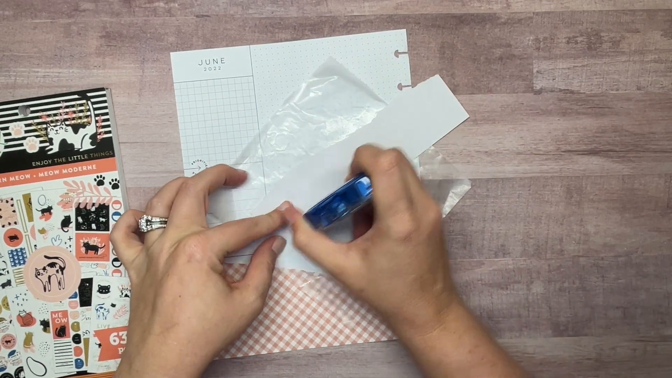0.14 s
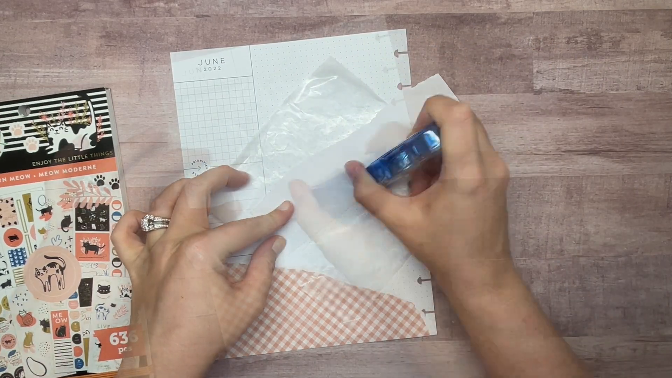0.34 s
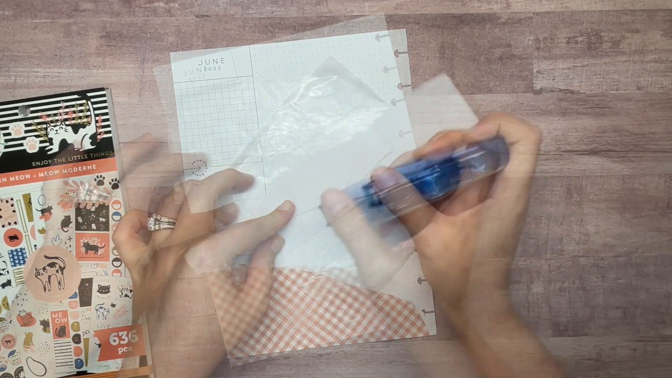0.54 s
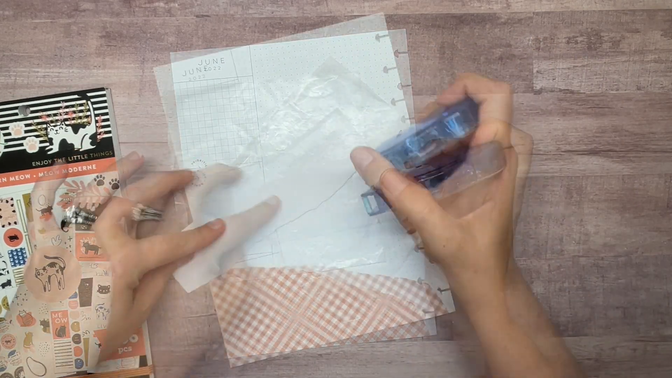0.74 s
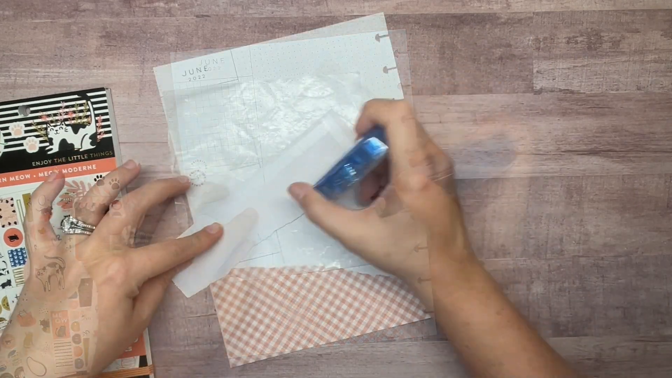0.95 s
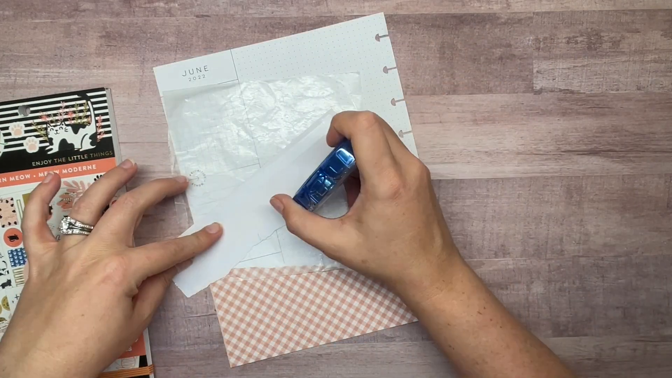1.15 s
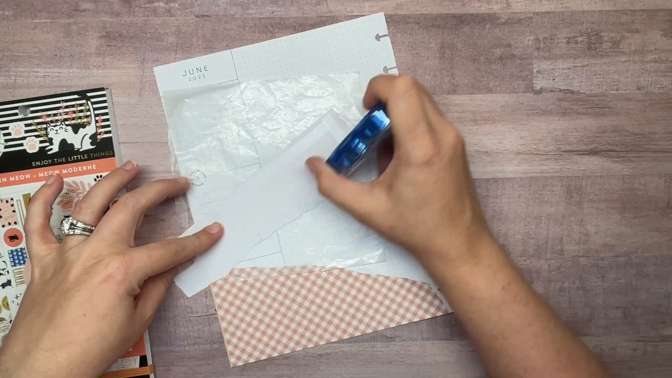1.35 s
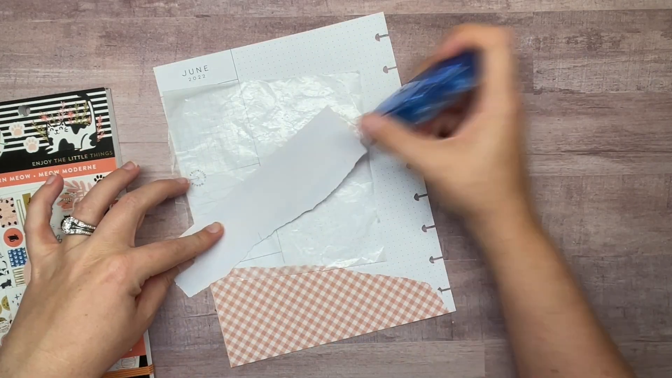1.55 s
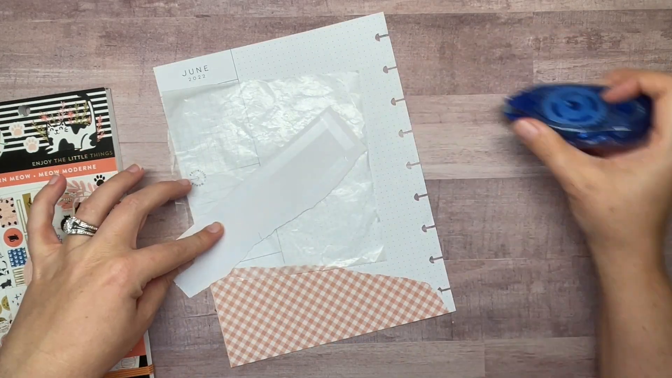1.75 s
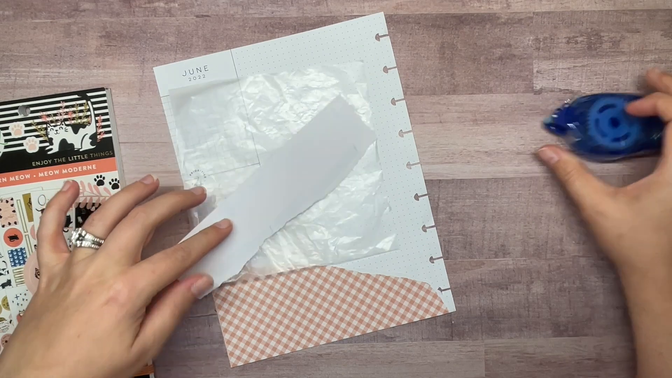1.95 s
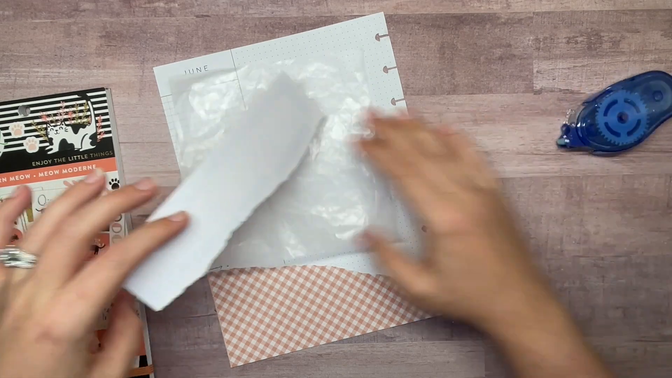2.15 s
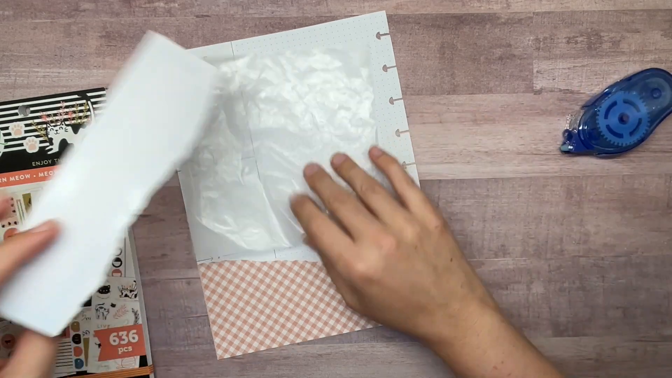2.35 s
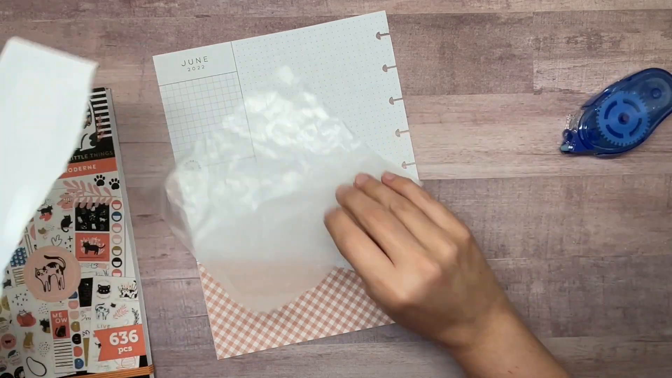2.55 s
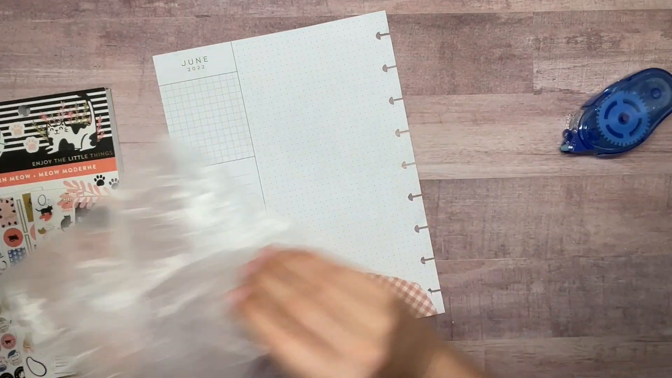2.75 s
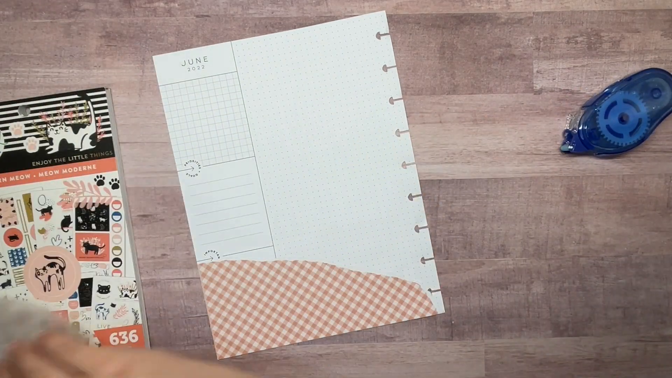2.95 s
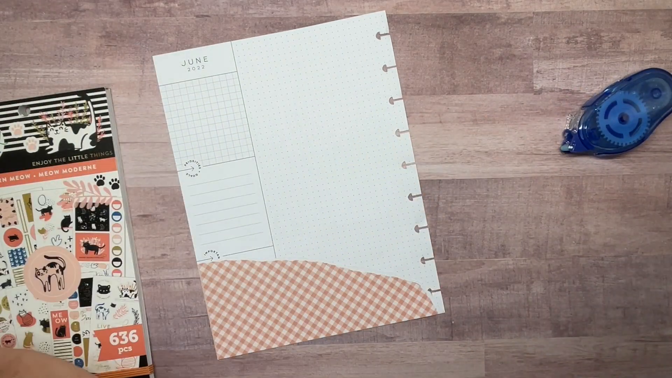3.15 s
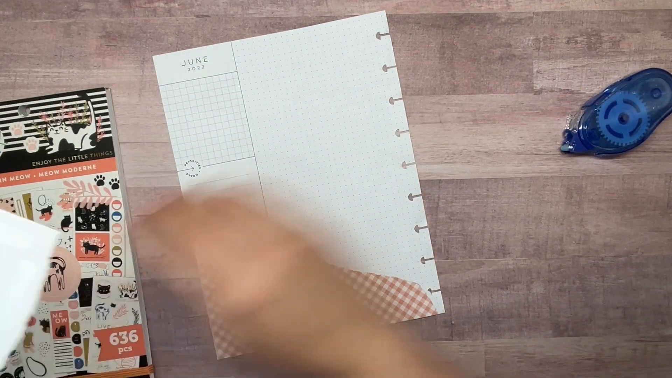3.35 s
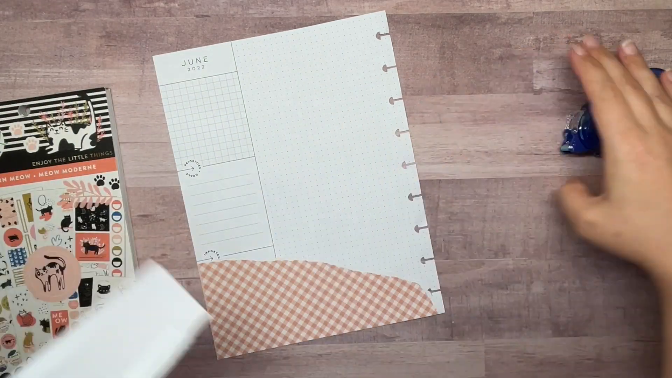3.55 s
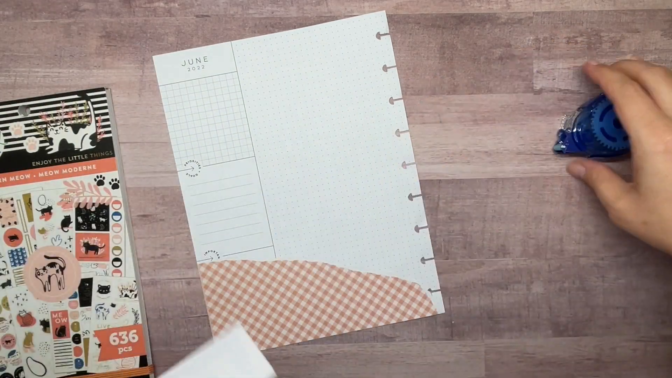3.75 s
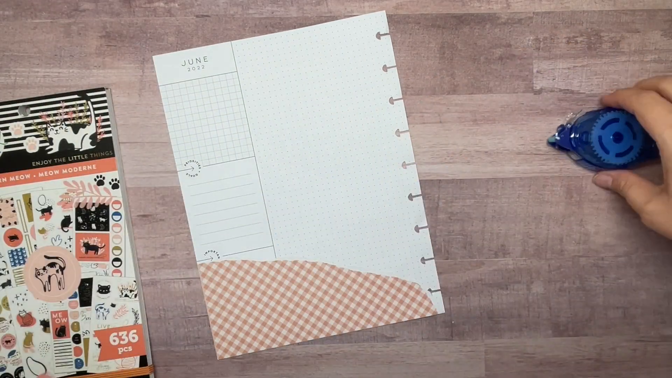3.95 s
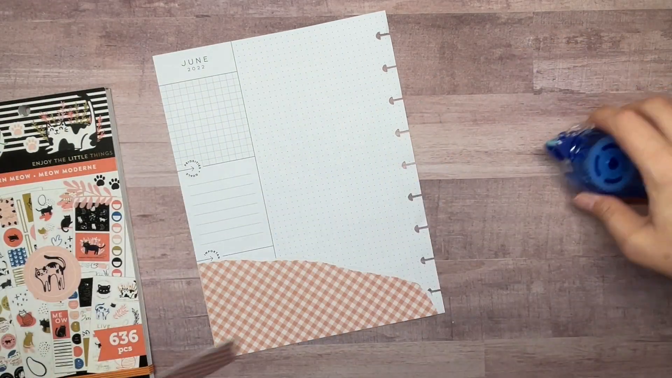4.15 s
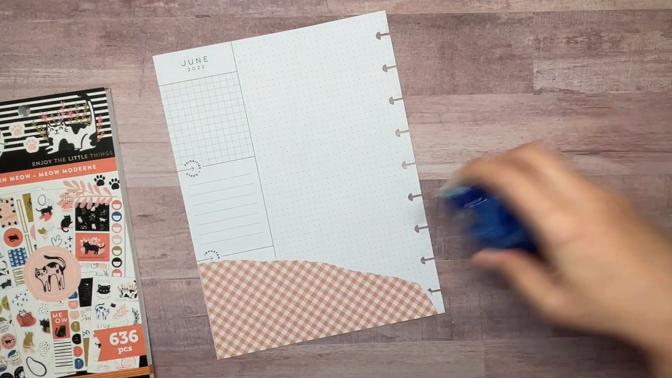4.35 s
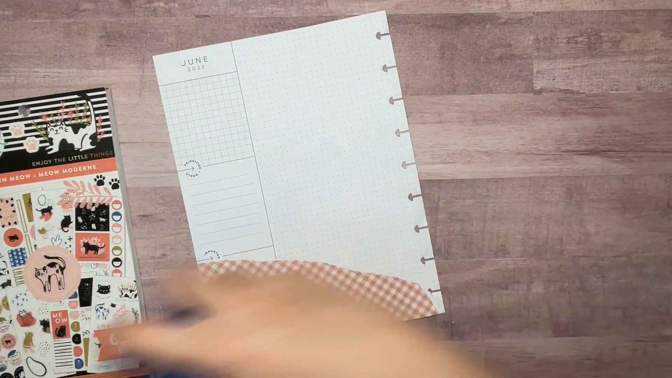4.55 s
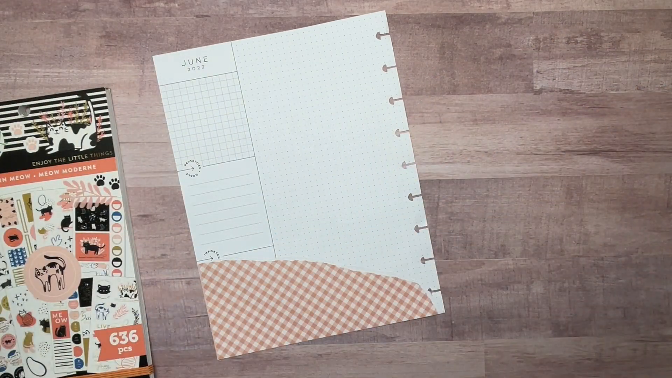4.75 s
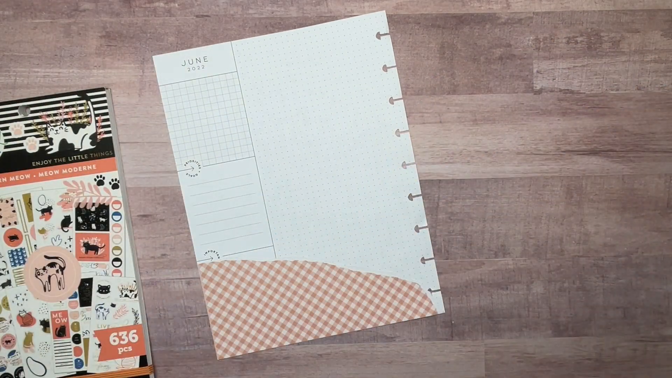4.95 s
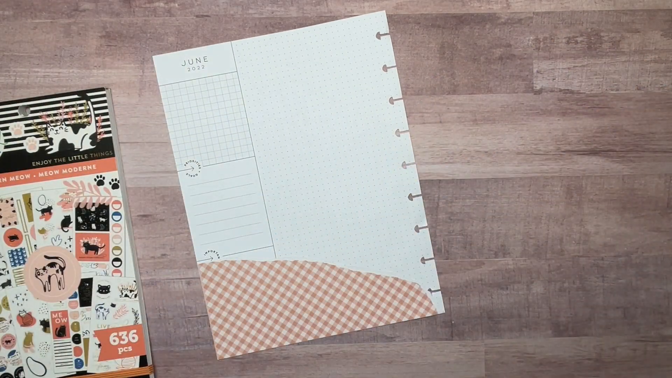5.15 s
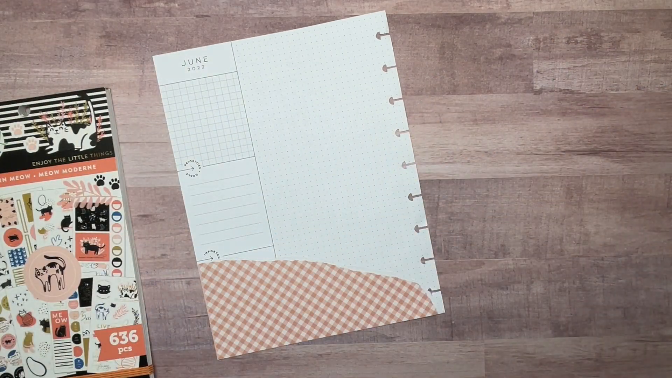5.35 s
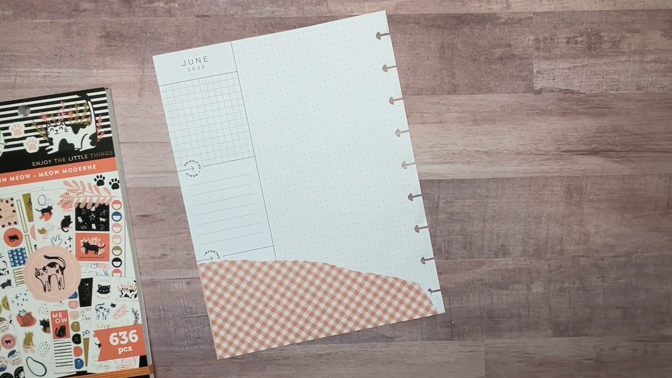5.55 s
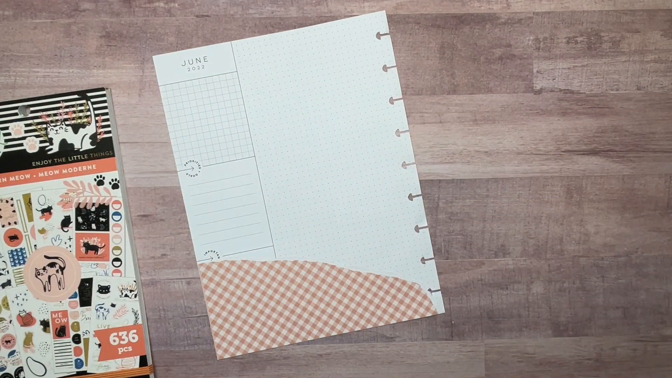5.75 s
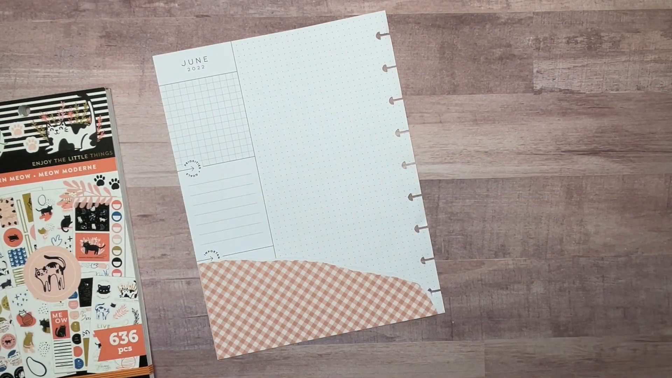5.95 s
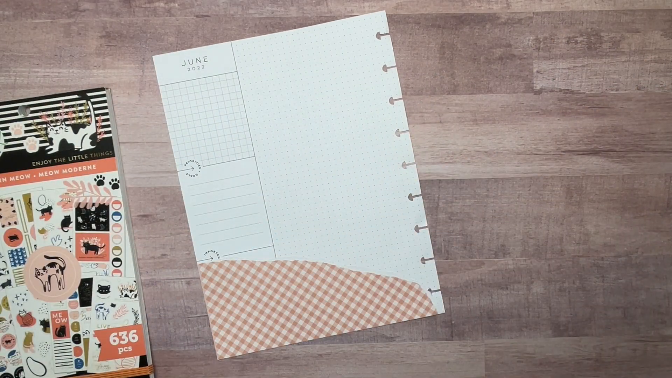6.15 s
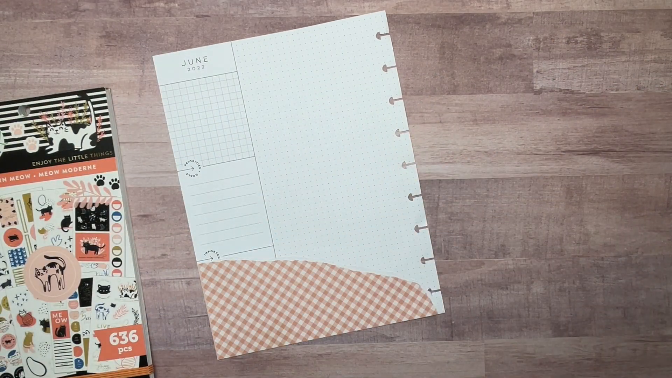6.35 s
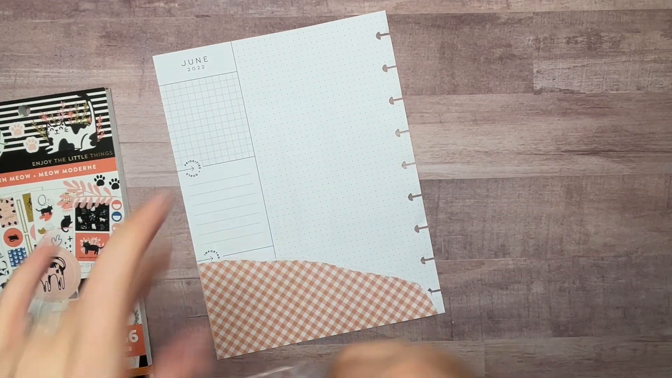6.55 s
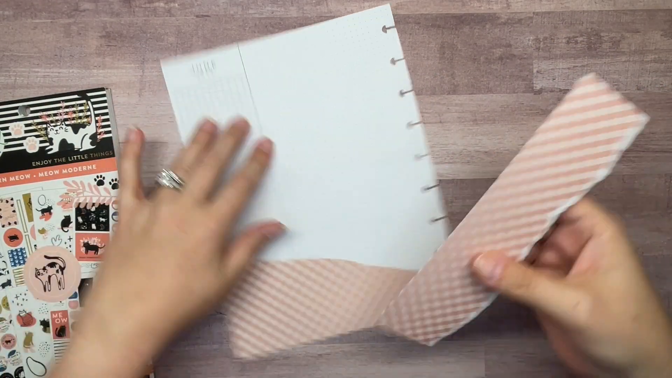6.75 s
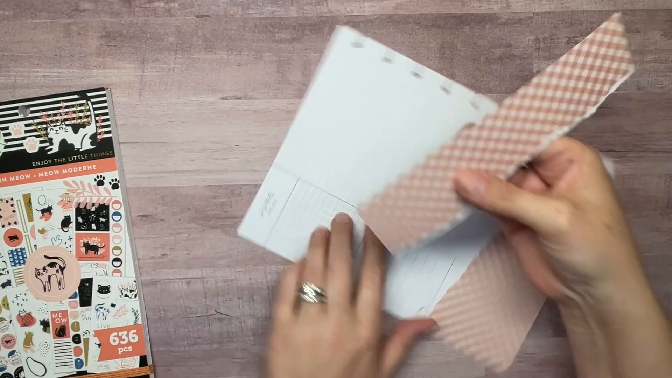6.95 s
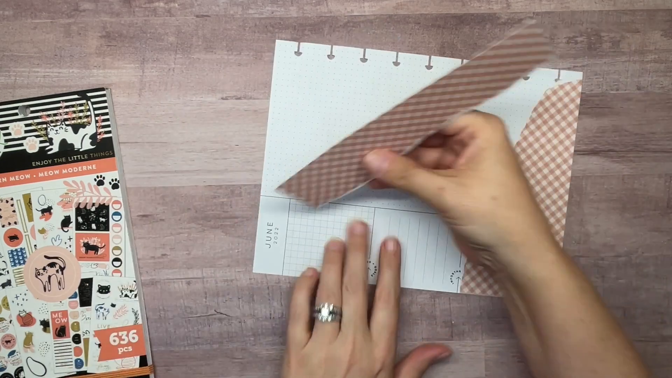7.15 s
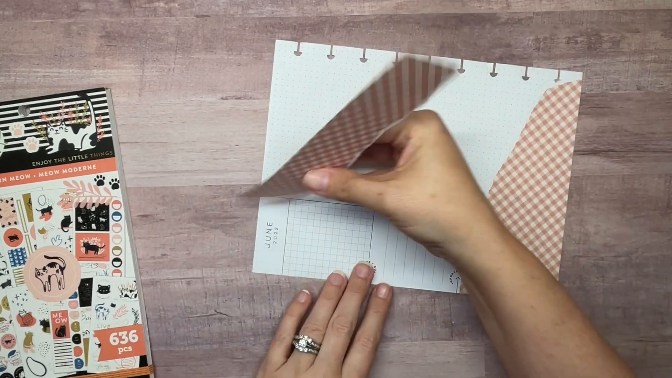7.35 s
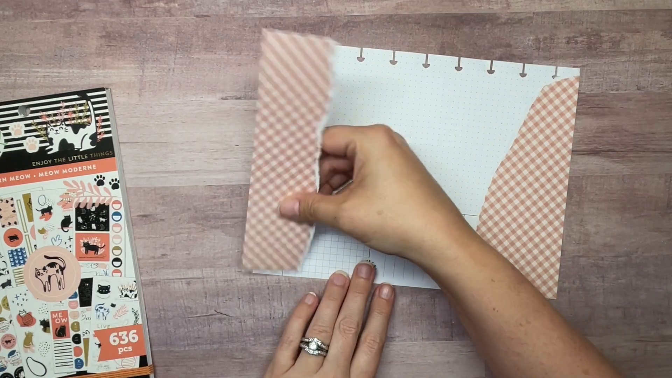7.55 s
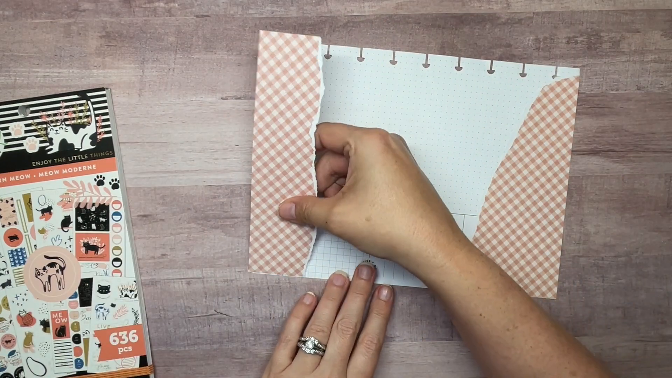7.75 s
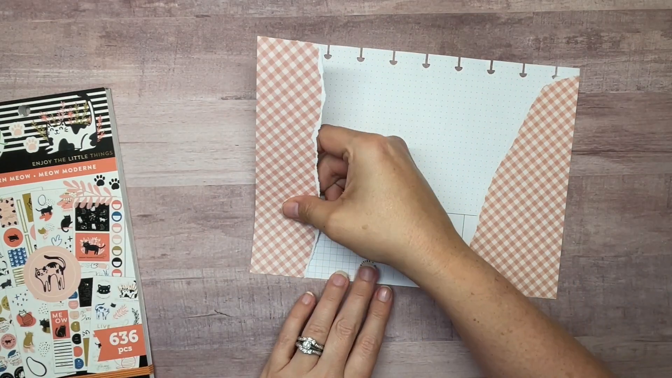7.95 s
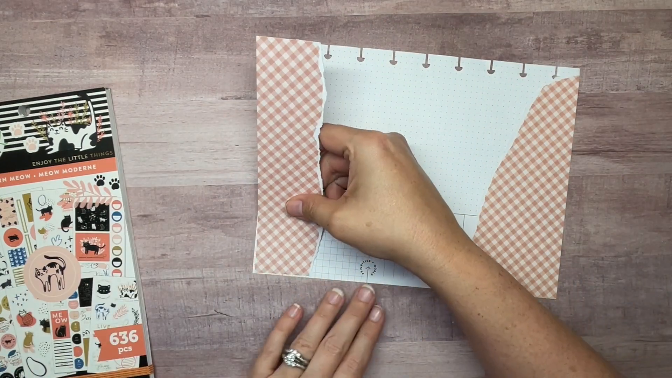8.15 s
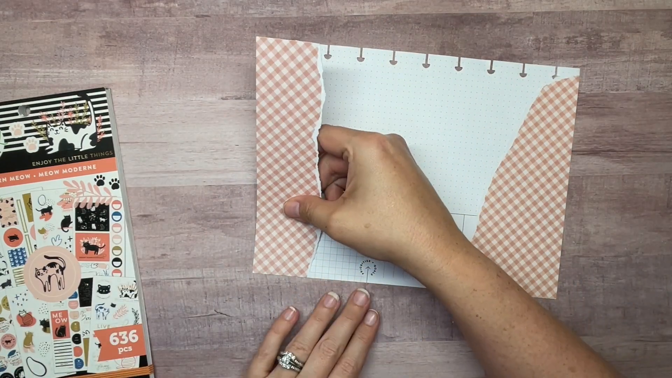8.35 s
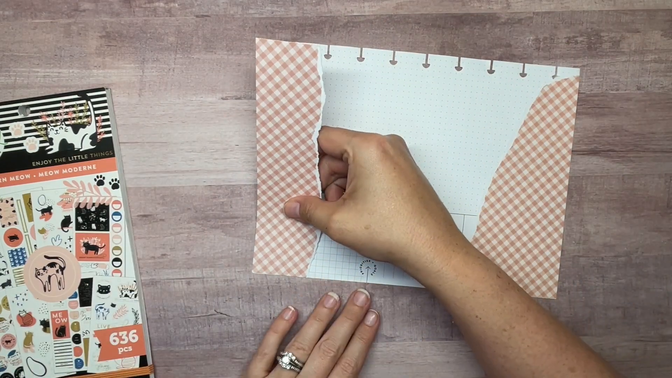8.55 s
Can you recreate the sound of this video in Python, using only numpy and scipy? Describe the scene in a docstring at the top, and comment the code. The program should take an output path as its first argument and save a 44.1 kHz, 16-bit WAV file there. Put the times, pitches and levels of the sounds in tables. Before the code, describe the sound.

A close stereo sound of desk crafting in a small, slightly reflective room, with steady low mains hum and faint fan drone. From 0 to 0.3 s a plastic tape runner ratchets in a fast, grainy zip; small shell knocks follow. A second, slightly softer stroke runs from 1.2 to 1.45 s, then clicks lead to a loud plastic clack at 1.9 s. Wax paper crackles and snaps brightly from 2.0 to 3.2 s, with a brief rip near 2.4. Between 3.4 and 4.5 s the runner is handled with light knocks, faint creaks and skin scuffs. Quiet rubbing continues; tools tick from 5.2 s, with one hard, ringing knock at 5.7 s farther off, and smaller ticks to 6.4. At 6.7 s a soft desk thud begins paper scuffs and airy hiss, with light taps to 7.6. A faint dry fingertip swish swells around 8.1 s, and a last small tap ends it near 8.5.

```python
"""Paper crafting at a desk in a small room, close to a two-port microphone, over a low electric hum.
A tape runner ratchets over a strip in two strokes, its pawl dropping off teeth, and is set down with a clack.
Wax paper crumples in runs of fine creases and sharp snaps, with one short rip; then the runner's shell is knocked.
Tools clatter farther off, each ringing at its own note; a hand thuds on the desk and slides paper round
in scuffs and hiss, with light taps; fingertips swish off the page, and a few last taps follow."""
import sys
import numpy as np
from scipy import signal
from scipy.fft import rfft, irfft, next_fast_len
from scipy.io import wavfile
from scipy.ndimage import uniform_filter1d

SR = 44100
rng = np.random.default_rng(int(sys.argv[2]) if len(sys.argv) > 2 else 0)


def unload_wav(signal):
    """Save mono or channel-first audio to the path in sys.argv[1] as 16-bit WAV at rate SR, clipped to [-1, 1]."""
    wavfile.write(
        sys.argv[1],
        SR,
        np.round(np.clip(np.atleast_2d(signal).T, -1, 1) * 32767).astype(np.int16),
    )


N = 383208
TIME = np.arange(N) / SR

# All levels are relative, within their layer.
# Brightness raises the highs and lowers the lows by that many dB.
# Touches of -14 dB chatter for the decay time of their kind; it doubles with every so many dB more.
DECAY_DOUBLES_DB = 29

# travel of the tape spool, one list a stroke: (time [s], ratchet teeth passed [count])
STROKES = [
    [(0.0005, 0), (.047, 2), (.063, 3), (.089, 5), (.145, 10), (.169, 12), (.271, 26), (.284, 27),
     (.299, 28), (.316, 29)],
    [(1.170, 0), (1.215, 3), (1.299, 11), (1.326, 13), (1.345, 14), (1.374, 15), (1.405, 16), (1.433, 17),
     (1.456, 18)],
]
# how hard each stroke is pressed, at full speed:
# (ratchet level [dB], peeling tape level [dB], brightness [dB], shell ring level [dB])
STROKE_FORCE = [(-24.5, -36, 2.5, 9.5), (-26.5, -35.5, 3.5, -2)]
# knocks on the runner's plastic shell: (time [s], level [dB], brightness [dB])
SHELL_TAPS = [(0.3694, -22, -10.5), (0.4205, -18, -1), (0.432, -24, -7), (0.4549, -24, 16), (.695, -32, -4),
              (1.058, -21, -1), (1.1268, -19.5, -4.5), (1.5065, -18.5, 0), (1.7435, -19, 3.5),
              (1.7651, -12.5, 4.5), (1.8974, -15, 3), (1.9045, 1.5, 2), (1.9168, -14, -10.5),
              (1.9923, -11.5, 6.5), (3.442, -25.5, 0), (3.533, -27, -3), (3.5728, -24, 6),
              (3.842, -25, 6.5), (3.898, -26, 6.5), (4.0077, -20.5, -3), (4.0823, -23, -1),
              (4.089, -22.5, -6), (4.1314, -26, 0), (4.1839, -28.5, -9), (4.3016, -20, -1),
              (4.3156, -14.5, 1), (4.324, -23.5, 8), (4.3424, -37, -21), (4.4412, -16, 4.5)]
# resonances of the shell: (frequency [Hz], level [dB], t60 [s])
SHELL_MODES = [(1563, -33, 0.098), (1710, -38, .03), (2330, -36, 0.025), (2560, -30, 0.02),
               (2740, -18, 0.008), (2830, -34, 0.05), (3700, -31.5, 0.024), (4300, -31, 0.02)]
# spectrum of the runner: (frequency [Hz], level [dB])
RUNNER_COLOUR = [(30, -18.5), (100, 0.5), (400, -11), (680, -11.5), (950, -5.5), (1600, 0.5), (2300, 4.5),
                 (3400, 0.5), (4500, 4.5), (5600, -2.5), (7500, 0), (10400, -0.5), (11500, -3),
                 (13000, -23), (16000, -28.5)]
SHELL_DECAY_S, TOOTH_GAIN_DB = 0.003, 4.5


def tape_runner(tooth_decay_s=0.0016, rebound_s=0.0022, rebound_db=-2, uneven_db=1.44,
                tap_db=-9, pawl_ring_db=-15.0, tap_ring_db=-21):
    """The pawl drops off each tooth and rebounds, glue peels from the tape, and the shell rings with it all."""
    works = drive = 0
    for travel, (ratchet_db, peel_db, bright_db, shell_db) in zip(STROKES, STROKE_FORCE):
        drops, peeling = stroke(travel, ratchet_db, peel_db, bright_db, uneven_db, tooth_decay_s)
        rebounds = [(s + rebound_s, db + rebound_db, decay, b) for s, db, decay, b in drops]
        peel = peeling * grains(per_s=8000, spread_db=4.5, clump_db=2.0, clumps_per_s=400)
        ratchet = contacts(drops + rebounds, grain_db=8.5, rise_s=0.00056)
        pull = from_db(TOOTH_GAIN_DB) * ratchet + peel
        works = works + pull
        drive = drive + from_db(pawl_ring_db + shell_db) * pull
    taps = contacts(with_decay(SHELL_TAPS, SHELL_DECAY_S), grain_db=2.5, rise_s=0.0012)
    taps = from_db(tap_db) * taps
    # the works sit inside the shell and drive it hardest; knocks from outside are damped by the hand
    shell = ring(drive + from_db(tap_ring_db) * taps, SHELL_MODES)
    # the grip keeps shifting, and with it the modes that ring best
    shell = flexing(shell, depth_db=2.9, per_s=55)
    return colour(works + taps + shell, RUNNER_COLOUR)


FULL_TEETH_PER_S = 100
PEEL_DB_PER_OCTAVE, TOOTH_DB_PER_OCTAVE = 14.5, -1.04  # change per doubling of speed


def stroke(travel, ratchet_db, peel_db, bright_db, uneven_db, decay_s):
    """One pull: the pawl's drops and the gain of the peeling tape, both set by the spool's speed."""
    s, teeth = np.transpose(travel)
    teeth_per_s = np.gradient(np.interp(TIME, s, teeth)) * SR
    speed = uniform_filter1d(teeth_per_s, size=900)
    octaves = np.log2(np.maximum(speed, 1) / FULL_TEETH_PER_S)
    times = np.interp(np.arange(teeth[-1] + 1), teeth, s)
    levels = ratchet_db + TOOTH_DB_PER_OCTAVE * octaves[(times * SR).astype(int)]
    levels = levels + rng.normal(0, uneven_db, len(times))
    drops = [(t, db, decay_s, bright_db) for t, db in zip(times, levels)]
    peeling = from_db(peel_db + PEEL_DB_PER_OCTAVE * octaves) * (speed > 1)
    return drops, peeling


# fingers shift on the runner and its shell creaks: (start time [s], length [s], level [dB])
GRIPS = [(.46, 0.021, -52), (.69, 0.032, -61), (3.52, 0.027, -55), (3.82, 0.11, -59), (3.96, 0.11, -47.5),
         (4.29, 0.015, -42), (4.47, 0.049, -62)]
# the hollow of the runner, rubbed under the fingers: (frequency [Hz], level [dB], t60 [s])
HOLLOW_MODES = [(1385, -8.5, 0.12), (1603, 6, 0.042), (2305, -6, 0.032), (2960, 0.5, 0.066),
                (4470, -5, 0.0082)]
RUB_ATTACK_S, RUB_RELEASE_S = 0.03, 0.028


def grip(tick_db=-4.5, creak_db=-3):
    """Small slips of the fingertips tick on the shell and set its hollow ringing."""
    slips = grains(per_s=600, spread_db=3.5, clump_db=2.5, clumps_per_s=90)
    ticks = from_db(tick_db) * colour(slips, RUNNER_COLOUR)
    creak = from_db(creak_db) * rms_one(ring(slips, HOLLOW_MODES))
    return swells(GRIPS, RUB_ATTACK_S, RUB_RELEASE_S) * (ticks + creak)


# a sheet is bent and a run of small creases gives way:
# (start time [s], length [s], level [dB], brightness [dB])
CRUMPLES = [(1.542, 0.095, -50.5, -5), (1.735, 0.14, -50, 0.5), (1.922, 0.21, -51, -6),
            (2.179, 0.11, -60.5, 11), (2.308, 0.12, -49.5, 4.5), (2.494, 0.07, -44, -0.5),
            (2.614, 0.075, -61, -14), (2.745, 0.051, -50.5, -5), (2.845, 0.22, -57.5, -3),
            (3.035, 0.051, -51, 9.5), (3.125, 0.044, -52, 2.5), (5.16, 0.041, -55.5, -8.5),
            (5.356, .02, -58, -10), (6.419, 0.011, -38, -3.5)]
# large creases snap, each on a facet of its own pitch:
# (time [s], level [dB], brightness [dB], facet note [Hz])
SNAPS = [(2.039, -19, -2, 4450), (2.0487, -10.5, 2.5, 4350), (2.126, -28, -1, 5000),
         (2.189, -27.5, -5, 3000), (2.212, -20, 2, 6200), (2.252, -28, 4, 5500), (2.258, -22, 10, 6700),
         (2.306, -15.5, 5, 3720), (2.3115, -13, 10, 4260), (2.3384, -19.5, 6.5, 5470),
         (2.344, -21, 6.5, 3340), (2.377, -36, -3, 1500), (2.506, -26, 4, 2400), (2.5235, -21, 3, 2500),
         (2.5315, -20, -3, 1300), (2.5469, -12, 3, 2340), (2.562, -16, 4, 1600), (2.573, -34, -7, 3200),
         (2.586, -25, 7, 4000), (2.604, -28.5, -6, 5500), (2.6665, -18.5, 5, 3200), (2.6705, -9, 2, 2620),
         (2.678, -20, 7, 4300), (2.6875, -12.5, 1.5, 2680), (2.7565, -19, 5, 2370), (2.766, -22, 7, 2500),
         (2.779, -15, -2.5, 4020), (2.7969, -15, 3.5, 2440), (2.807, -27, 1, 3400), (2.822, -24, -3, 2900),
         (2.8767, -19.5, -4.5, 2090), (2.891, -32, -5, 3000), (2.9121, -26, 5, 4300),
         (2.9525, -18.5, 0, 1900), (2.984, -28.5, 12.5, 4240), (3.0488, -12, 6, 6000),
         (3.1311, -28, 1, 1500), (3.157, -27, 6, 4500), (3.177, -27, 6, 3880)]
# the sheet comes unstuck from the page in one short rip: (start time [s], length [s], level [dB])
UNSTICK = [(2.413, 0.045, -35)]
# spectrum of the wax paper, shared by the light taps: (frequency [Hz], level [dB])
WAX_COLOUR = [(150, -41.5), (400, -11.5), (620, -1.5), (1000, -3), (1350, 6), (1800, 0), (2700, 3),
              (4400, -1), (5800, -1.5), (8000, -1.5), (10500, -2), (11600, -10), (13000, -34),
              (16000, -37.5)]
CRUMPLE_ATTACK_S, CRUMPLE_RELEASE_S, SNAP_DECAY_S = 0.01, 0.013, 0.0012


def wax_paper(snap_db=-3.0, crinkle_db=5, rip_db=5):
    """Bent wax paper gives way in snaps over a bed of small creases; the glue lets go in a dense rip."""
    bright_db, = in_time([(s + length / 2, b) for s, length, db, b in CRUMPLES])
    crackle = grains(per_s=2000, spread_db=3.8, clump_db=2, clumps_per_s=300)
    small = swells(CRUMPLES, CRUMPLE_ATTACK_S, CRUMPLE_RELEASE_S) * crackle
    large = contacts(with_decay(SNAPS, SNAP_DECAY_S), grain_db=5.5, rise_s=0.00042, note_db=-7, note_q=5.7)
    tearing = grains(per_s=5200, spread_db=4.5, clump_db=-0.5, clumps_per_s=480)
    rip = swells(UNSTICK, attack_s=0.014, release_s=0.0035) * tearing
    creases = from_db(snap_db) * large
    creases = creases + from_db(crinkle_db) * brighten(small, bright_db)
    creases = creases + from_db(rip_db) * brighten(rip, bright_db=6.0)
    return colour(flexing(creases, depth_db=3.5, per_s=170), WAX_COLOUR)


# tools knocking together at the side, each rebounding once: (time [s], level [dB],
# rebound against the first blow [dB], brightness [dB], tool note [Hz], holder level [dB],
# ring against the blow [dB])
TOOL_KNOCKS = [(5.16, -14, -15.5, 3, 2930, -25, -40), (5.356, -24.5, -7.5, -7.5, 2870, -20, -42.5),
               (5.654, -23, -7, -3.5, 2950, -16.5, -29.5), (5.699, -25.5, 3.5, -12, 2090, -30.5, -14),
               (5.7075, -1, 1, 4, 2790, 1, -28), (5.786, -12, -9, 5.5, 2960, -18, -25.5),
               (5.808, -15, -1, 2, 4450, -10, -19), (6.303, -25.5, -1, 2, 2730, -29.5, -28),
               (6.4255, -23, 4, -1.5, 6150, -37, -26)]
# resonances of the tools and their holder: (frequency [Hz], level [dB], t60 [s])
HOLDER_MODES = [(263, -41, 0.2), (347, -30.5, 0.17), (410, -30.5, 0.15), (497, -27, 0.025),
                (563, -27.5, 0.14), (641, -29, 0.018), (763.6, -36, 0.18), (930, -40.5, 0.08),
                (1207, -28, 0.12), (2094, -43.5, 0.22), (3688, -34, 0.14), (4470, -42.5, 0.28),
                (4550, -28, 0.08)]
# spectrum of the tools: (frequency [Hz], level [dB])
TOOL_COLOUR = [(100, -14), (400, -2.5), (1000, -4.5), (1900, -2.5), (2900, -5), (4400, -1.5), (5600, -7.5),
               (8000, -5), (10600, -1), (12000, -10), (13200, -28.5), (16000, -30)]
TOOL_DECAY_S, TOOL_REBOUND_S, TOOL_RING_T60_S = 0.0047, .0105, 0.22


def tools(level_db=-12, holder_db=-5.5):
    """Hard things knock and rebound; each rings on at its own note, and the blows shake their holder."""
    hits, shoves, notes = [], 0, 0
    for s, db, rebound_db, bright_db, hz, shove_db, ring_db in TOOL_KNOCKS:
        for at, loss_db in ((s, 0), (s + TOOL_REBOUND_S, rebound_db)):
            hits.append((at, db + loss_db, bright_db, hz))
            shoves = shoves + strike(at, shove_db + loss_db)
        notes = notes + ring(strike(s, db + ring_db), [(hz, 0, TOOL_RING_T60_S)])
    clicks = contacts(with_decay(hits, TOOL_DECAY_S), grain_db=0.5, rise_s=0.00048, note_db=1.5, note_q=11)
    clatter = from_db(level_db) * colour(clicks + notes, TOOL_COLOUR)
    return clatter + from_db(holder_db) * ring(shoves, HOLDER_MODES)


# hands rub over paper and desk: (start time [s], length [s], level [dB])
RUBS = [(.46, 0.029, -35), (.55, 1, -58), (3.46, 0.3, -46.5), (3.81, 0.26, -44), (3.95, 0.085, -51),
        (4.55, 0.75, -52.5), (4.9, 0.033, -41.5), (5.16, 0.015, -60), (5.38, 0.16, -45.5),
        (5.88, 0.5, -52.5), (6.39, 0.032, -44), (6.68, 0.34, -48.5), (7.1, 0.42, -50), (7.25, 0.038, -46)]
# paper glides over the desk: (start time [s], length [s], level [dB])
GLIDES = [(.52, 0.18, -55), (1.54, 0.36, -60.5), (3.5, 0.21, -77), (3.81, 0.028, -48.5), (3.97, 0.18, -67),
          (4.89, 0.16, -65), (5.42, 0.094, -75), (6.65, 0.33, -47.5), (6.715, 0.15, -67),
          (6.725, 0.095, -43), (7.08, 0.069, -53), (7.2, 0.077, -60), (7.47, 0.025, -58)]
# spectrum of the rubbing: (frequency [Hz], level [dB])
SCUFF_COLOUR = [(200, -16), (650, -10.5), (1000, -2.5), (1270, 4), (1800, -3), (2300, 2), (3000, -2.5),
                (4300, -3), (5500, -4), (8000, -11.5), (10700, -11.5), (12200, -41), (16000, -46.5)]
# spectrum of the gliding: (frequency [Hz], level [dB])
HISS_COLOUR = [(800, -13), (1250, -7), (1800, -14), (3000, -3), (6000, 4.5), (8500, -1.5), (10600, 3),
               (11600, -4.5), (12800, -25), (15000, -21), (16000, -21.5)]
GLIDE_ATTACK_S, GLIDE_RELEASE_S = 0.016, 0.035


def sliding(scuff_db=-1, hiss_db=3):
    """Pressed skin scuffs in small slips; paper gliding on the desk gives a fine hiss."""
    skin = grains(per_s=12000, spread_db=1.2, clump_db=0.8, clumps_per_s=360)
    scuff = swells(RUBS, RUB_ATTACK_S, RUB_RELEASE_S) * skin
    fibres = grains(per_s=41000, spread_db=2.8, clump_db=1, clumps_per_s=110)
    hiss = swells(GLIDES, GLIDE_ATTACK_S, GLIDE_RELEASE_S) * fibres
    hiss = flexing(hiss, depth_db=1.5, per_s=45)
    scuff = flexing(scuff, depth_db=1.2, per_s=120)
    return from_db(scuff_db) * colour(scuff, SCUFF_COLOUR) + from_db(hiss_db) * colour(hiss, HISS_COLOUR)


# light taps: the first four, up to 5.33 s, tick on the runner's shell, the rest are fingertips and paper edges
# on the desk: (time [s], level [dB], brightness [dB], note [Hz])
LIGHT_TAPS = [(4.5405, -33, -5, 1630), (4.559, -35, 0, 1655), (4.6742, -43.5, -12, 1440),
              (5.3307, -40.5, -8, 1260), (6.6677, -28, -1, 596), (6.8994, -34.5, -6.5, 1140),
              (7.006, -34.5, -4, 5730), (7.2863, -31.5, 5, 690), (7.319, -28, 1, 600),
              (7.3225, -38, 9, 5640), (7.4647, -34, 6, 5630), (7.5063, -32, 13, 2830),
              (7.598, -44.5, 5, 5960), (8.234, -46, 6, 6880), (8.336, -46.5, 15, 3150),
              (8.527, -33, 1.5, 596)]


def light_taps(level_db=-4, decay_s=0.00127):
    """Light taps, each a brief chatter with a short hollow note."""
    taps = contacts(with_decay(LIGHT_TAPS, decay_s), grain_db=0.5, rise_s=0.00064, note_db=13.5, note_q=12)
    return from_db(level_db) * colour(taps, WAX_COLOUR)


# fingertips are drawn down the page until they slip off its edge: (time [s], level [dB])
FINGER_DRAG = [(7.6, -89), (7.635, -67), (7.81, -68.5), (7.95, -60.5), (8.09, -55.5), (8.16, -58.5),
               (8.235, -66.5), (8.27, -90)]
# spectrum of the fingertips: (frequency [Hz], level [dB])
FINGERTIP_COLOUR = [(300, -15.5), (1000, -3), (1270, 2), (1580, 5), (1800, -10.5), (2150, 1.5),
                    (2400, -0.5), (2850, 6), (3700, -4.5), (4400, -0.5), (5600, 0.5), (7500, -9),
                    (10900, -5.5), (11800, -36), (16000, -48)]


def finger_drag(level_db=-1):
    """Dry skin slips over smooth paper in fine grains: a soft swish."""
    db, = in_time(FINGER_DRAG)
    slips = grains(per_s=16000, spread_db=3.6, clump_db=2.0, clumps_per_s=120)
    return from_db(level_db + db) * colour(slips, FINGERTIP_COLOUR)


# soft blows on the desk: (time [s], level [dB], contact [s])
THUMPS = [(1.076, -29.5, 0.0023), (1.096, -24, 0.012), (1.767, -36, 0.0059), (1.908, -25, 0.00087),
          (2.001, -33, 0.0023), (2.219, -23, 0.0112), (5.717, -34.5, 0.0054), (6.668, -26, 0.0032),
          (6.827, -53, .0015), (7.318, -53, 0.00084)]
# resonances of the desk top: (frequency [Hz], level [dB], t60 [s])
DESK_MODES = [(49.3, -15, 0.68), (86, -10.5, 0.33), (135.4, -0.5, 0.38), (157.1, 8, 0.16),
              (203, -21.5, 0.059), (313, -14.5, 0.046)]


def desk(stiff_hz=55):
    """A soft push bends the desk top; a longer contact gives a deeper thud."""
    force = np.zeros(N)
    for s, db, contact in THUMPS:
        push = np.sin(np.pi * np.clip((TIME - s) / contact, 0, 1)) ** 2
        force += from_db(db) * push / (push.sum() + 1e-9)
    return signal.sosfilt(signal.butter(2, stiff_hz, "high", fs=SR, output="sos"), ring(force, DESK_MODES))


# fan drone: (frequency [Hz], width [Hz], level [dB])
DRONE = [(115.8, 5.5, -58.5), (154.2, 8.3, -55)]
# spectrum of the air in the room: (frequency [Hz], level [dB])
ROOM_COLOUR = [(20, -25), (45, 1.5), (65, -5), (100, 8.5), (135, 1), (200, -7), (290, -20.5), (350, -15.5),
               (470, -17.5), (580, -14), (850, -26), (1400, -34), (3000, -39.5), (5000, -46), (10500, -47),
               (13000, -70)]
ROOM_DB, MAINS_HZ, MAINS_DB = -48.5, 120, -45


def room_tone(side_db=-5):
    """Mains hum and the narrow drone of a fan over soft air noise, a little to the left."""
    phase = 2 * np.pi * MAINS_HZ * TIME + 0.034 * drift(5.8)
    hum = from_db(MAINS_DB) * np.sqrt(2) * np.sin(phase)
    for hz, width, db in DRONE:
        # slow random changes of size and phase widen the tone
        wander = drift(2 * width) + 1j * drift(2 * width)
        tone = np.real(wander * np.exp(2j * np.pi * hz * TIME))
        hum = hum + from_db(db) * rms_one(tone)
    mid, side = (colour(rng.standard_normal(N), ROOM_COLOUR) for k in range(2))
    # long waves reach both ports alike
    side = signal.sosfilt(signal.butter(1, 450, "high", fs=SR, output="sos"), side)
    side = from_db(side_db) * side
    pan = from_db(np.array([[.55], [-.55]]))
    return (hum + from_db(ROOM_DB) * (mid + side * [[1], [-1]])) * pan


ROOM_T60_S = 0.33


def in_room(x, early_db, tail_db, alike, early_s):
    """Direct sound, quick reflections off desk and shelves, and a diffuse tail, partly shared by both sides."""
    age = TIME[:SR // 2]
    early, tail = (rms_one(np.exp(-age / s) * (1 - np.exp(-age / 0.0034)))
                   for s in (early_s, ROOM_T60_S / np.log(1000)))
    envelope = np.hypot(from_db(early_db) * early, from_db(tail_db) * tail) / np.sqrt(len(age))
    mid, side = rng.standard_normal((2, len(age))) * envelope
    alike = np.clip(alike, 0, 1)
    # the two sides differ most in the middle frequencies
    side = signal.lfilter(*signal.butter(1, [250, 7000], "band", fs=SR), side)
    echo = np.sqrt((1 + alike) / 2) * mid + np.sqrt((1 - alike) / 2) * side * [[1], [-1]]
    return x + signal.oaconvolve(x[None], echo, axes=1)[:, :N]


def contacts(rows, grain_db, rise_s, note_db=0, note_q=10):
    """Each touch is a chatter of tiny uneven impacts that builds up and dies, ringing at any notes it has."""
    out, age = np.zeros(N), TIME[:SR // 6]
    for s, db, decay, bright_db, *notes in rows:
        # the unevenness holds for ten samples at a time
        uneven = np.repeat(rng.standard_normal(len(age)), 10)[:len(age)]
        chatter = rng.standard_normal(len(age)) * from_db(grain_db * uneven)
        envelope = (1 - np.exp(-age / rise_s)) * np.exp(-age / max(decay, 1e-4))
        # the energy of a touch is set by the blow, however it chatters
        burst = rms_one(chatter * envelope) * np.sqrt(np.mean(envelope ** 2)) + 1e-18
        ringing = sum(signal.lfilter(*signal.iirpeak(hz, max(note_q, 2), fs=SR), burst) for hz in notes)
        burst = burst + from_db(note_db) * ringing
        start = max(int(s * SR), 0)
        out[start:start + len(age)] += from_db(db) * brighten(burst, bright_db)[:N - start]
    return out


def with_decay(rows, decay_s):
    """Give each touch its decay time: the harder, the longer it chatters."""
    return [(s, db, decay_s * 2 ** ((db + 14.0) / DECAY_DOUBLES_DB), *rest) for s, db, *rest in rows]


def strike(s, db):
    """One sharp impact: a single-sample force."""
    force = np.zeros(N)
    force[int(s * SR)] = from_db(db)
    return force


def ring(force, modes):
    """Decaying sines set off by the force."""
    out = np.zeros(N)
    for hz, db, t60 in modes:
        r, w = np.exp(-np.log(1000) / (t60 * SR)), 2 * np.pi * hz / SR
        mode = signal.lfilter([0, np.sin(w)], [1, -2 * r * np.cos(w), r * r], force + 1e-18)
        out += from_db(db) * mode
    return out


def grains(per_s, spread_db, clump_db, clumps_per_s):
    """Fibres catching and letting go: random ticks of uneven size that come in clumps."""
    born = rng.random(N) < per_s / SR
    sizes = from_db(spread_db * np.minimum(rng.exponential(1, N), 4)) * rng.choice([-1, 1], N)
    clumps = from_db(clump_db * np.clip(drift(clumps_per_s), -2, 2))
    return rms_one(born * sizes * clumps)


def flexing(x, depth_db, per_s):
    """What bends or shifts keeps changing which of its bands radiate best: each band's level drifts alone."""
    out, rest = 0, x
    for hz in 900 * 1.5 ** np.arange(7):
        low = signal.sosfilt(signal.butter(3, hz, fs=SR, output="sos"), rest)
        rest = signal.sosfilt(signal.butter(3, hz, "high", fs=SR, output="sos"), rest)
        out = out + low * from_db(depth_db * drift(per_s))
    return out + rest


def swells(rows, attack_s, release_s):
    """Gain of a row of hand movements: each builds up, holds to the end of its length and dies away."""
    gain = 0
    for s, length, db, *_ in rows:
        rise = np.clip((TIME - s) / attack_s, 0, 1)
        fall = np.exp(-np.clip((TIME - s - length) / release_s, 0, 20))
        gain = gain + from_db(db) * rise * fall
    return gain


def brighten(x, bright_db, pivot_hz=4500):
    """See-saw between lows and highs: a harder contact is brighter."""
    low = signal.lfilter(*signal.butter(1, pivot_hz, fs=SR), x)
    return low * from_db(-bright_db) + (x - low) * from_db(bright_db)


def colour(x, points):
    """Causal (minimum-phase) filter with the given spectrum; white noise keeps its power."""
    size = 4096
    hz, db = np.transpose(points)
    bins_hz = np.arange(size // 2 + 1) * SR / size
    gain = rms_one(from_db(np.interp(np.log(bins_hz + 1), np.log(hz), db)))
    # folding the cepstrum onto positive times makes the filter minimum-phase
    cepstrum = irfft(np.log(gain))
    cepstrum[1:size // 2] *= 2
    cepstrum[size // 2 + 1:] = 0
    return signal.oaconvolve(x, irfft(np.exp(rfft(cepstrum))))[:N]


def drift(per_s):
    """Smooth chance with an rms of 1: random knots joined by straight lines."""
    knots = np.arange(0, TIME[-1] + 1, 1 / per_s)
    return rms_one(np.interp(TIME, knots, rng.standard_normal(N)[:len(knots)]))


def in_time(rows):
    """Each column of a curve at every sample."""
    s, *columns = np.transpose(rows)
    return [np.interp(TIME, s, c) for c in columns]


def rms_one(x):
    """Scale to an rms of 1."""
    return x / np.sqrt(np.mean(x ** 2) + 1e-20)


def from_db(db):
    """Decibels to gain."""
    return 10 ** (np.asarray(db) / 20)


def scene():
    """Everything on the desk shares one room; the tools lie farther off."""
    runner = tape_runner() + grip()
    runner = in_room(runner, early_db=-3.0, tail_db=-11.5, alike=0.12, early_s=0.0022)
    paper = wax_paper() + light_taps() + sliding() + finger_drag()
    paper = in_room(paper, early_db=-3, tail_db=-12.5, alike=0.15, early_s=0.004)
    clatter = in_room(tools(), early_db=-1.5, tail_db=-8.0, alike=0.11, early_s=0.0064)
    return runner + paper + clatter + desk() + room_tone()


# phase by which the left microphone port leads the right: (frequency [Hz], phase [rad])
PORT_PHASE = [(20, 0), (400, -.15), (950, -1.15), (1400, -.25), (2000, .3), (2600, .65), (3200, .1),
              (4050, .3), (4400, 2.2), (4850, 3.4), (5700, 6.1), (6200, 6.4), (8500, 9.3), (9400, 9.5),
              (12300, 12.7), (13700, 12.8), (15500, 15.7)]
CUTOFF_HZ = 16000


def record(dry):
    """The two microphone ports differ in phase; the top is cut."""
    size = next_fast_len(N + SR // 10)
    lead = np.interp(np.arange(size // 2 + 1) * SR / size, *np.transpose(PORT_PHASE))
    # each port takes half the phase
    turn = np.exp(.5j * lead * np.array([[1], [-1]]))
    ports = irfft(rfft(dry, size) * turn, size)[:, :N]
    return signal.sosfilt(signal.ellip(10, .1, 80, CUTOFF_HZ, fs=SR, output="sos"), ports)


dry = scene()
out = record(dry)
unload_wav(out)
```